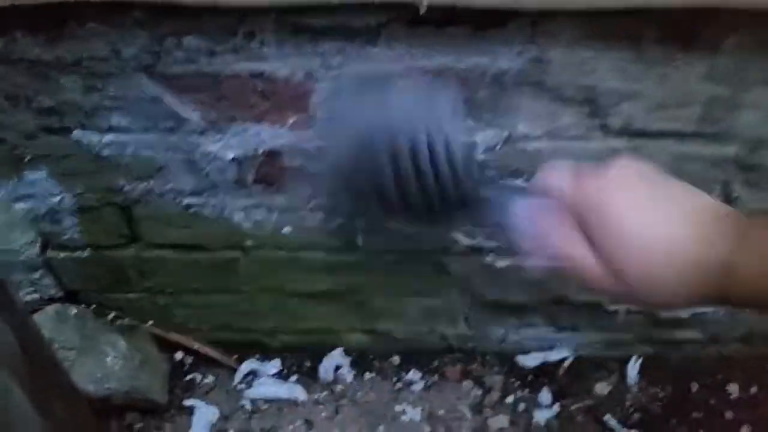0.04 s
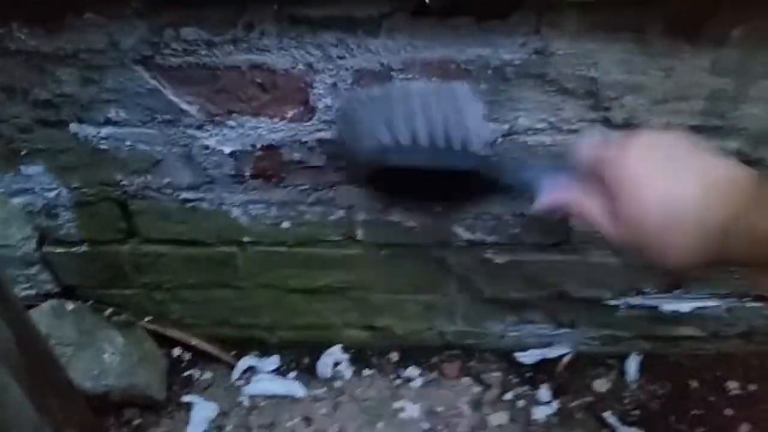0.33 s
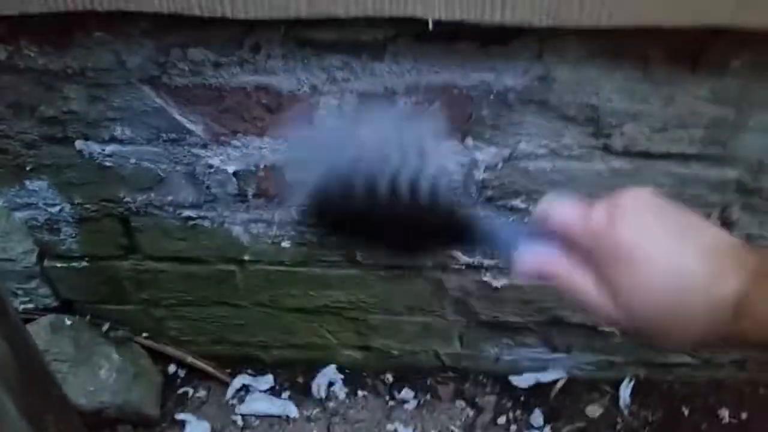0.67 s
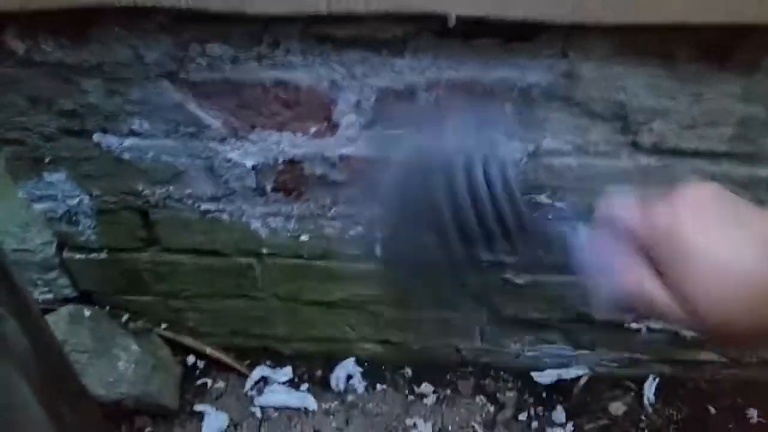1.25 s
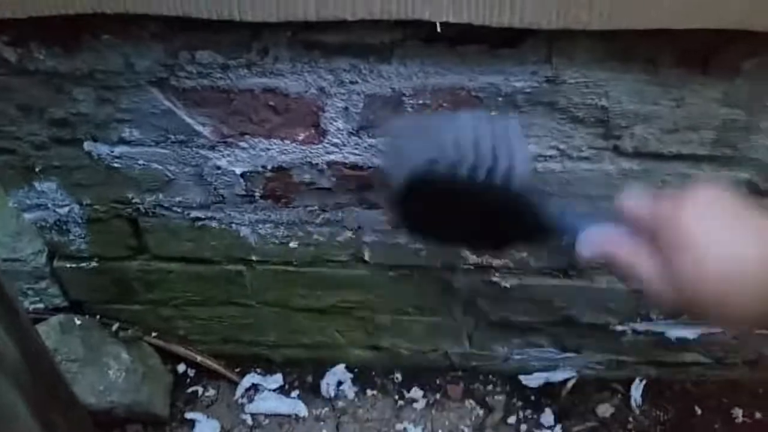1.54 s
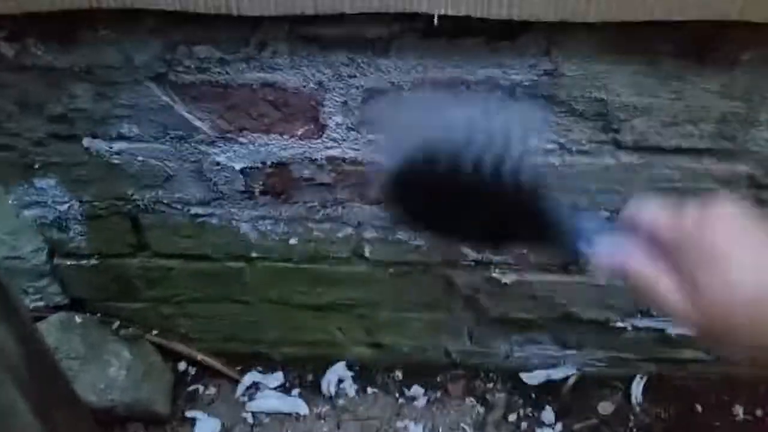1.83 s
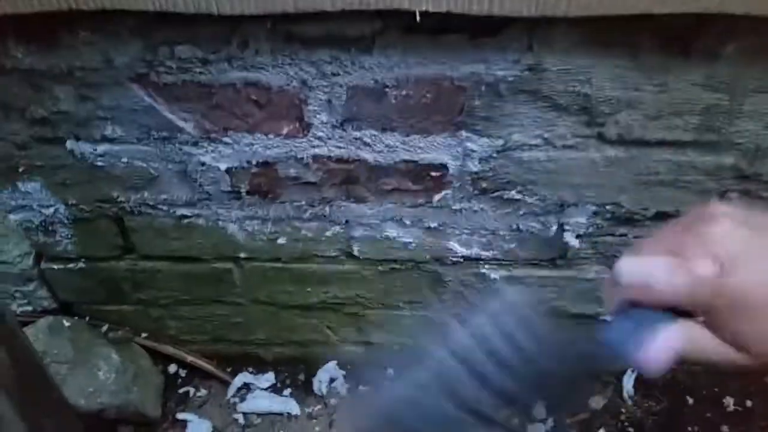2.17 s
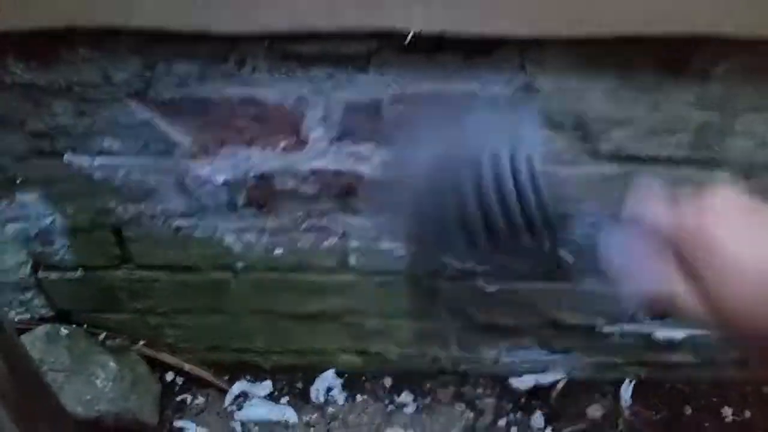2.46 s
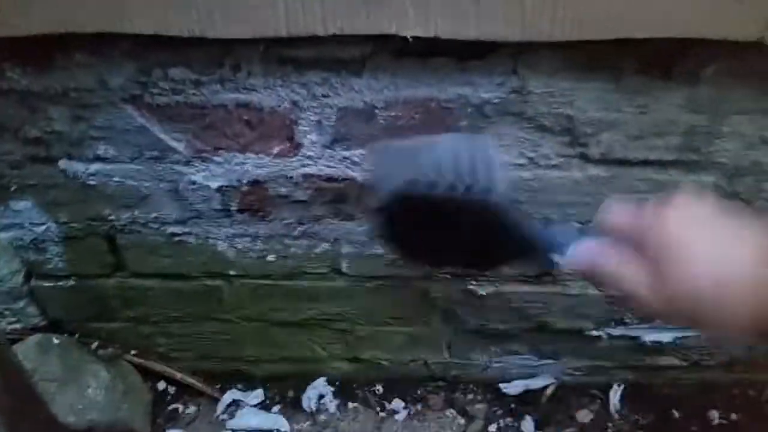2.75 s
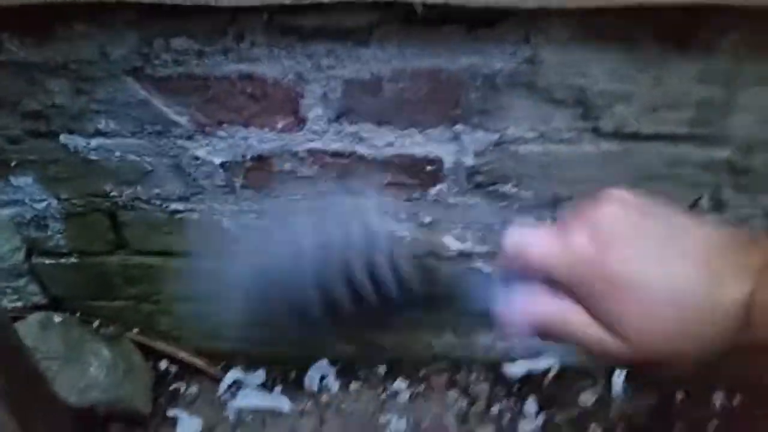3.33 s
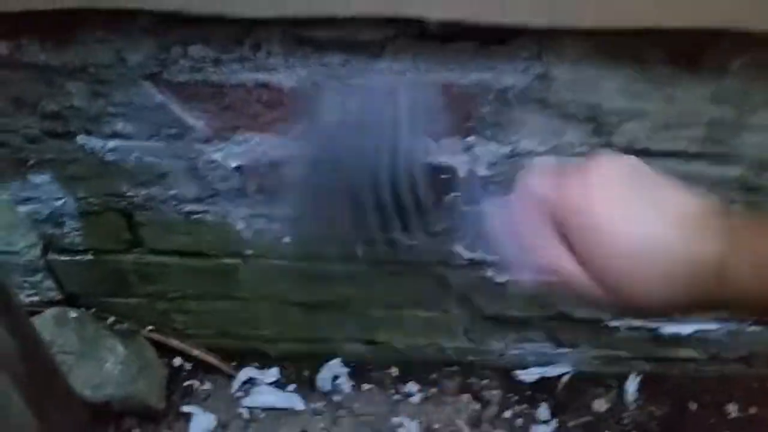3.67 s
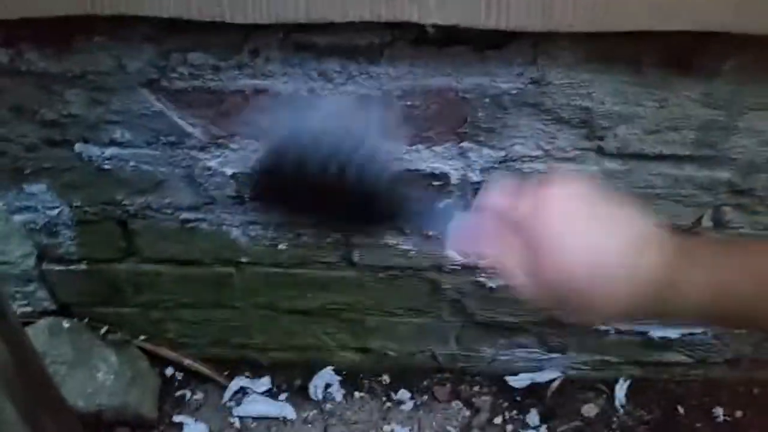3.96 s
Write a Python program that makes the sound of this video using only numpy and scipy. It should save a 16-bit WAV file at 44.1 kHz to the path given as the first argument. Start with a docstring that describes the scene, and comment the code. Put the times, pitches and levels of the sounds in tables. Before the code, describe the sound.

Close up in a yard, a stiff brush beats steadily on brick, every quick blow thumping and crunching with a short hiss of bristles. A few tiny grit ticks and a soft final scuff sound over low background hum.

```python
"""A yard outdoors, a stereo microphone close to a brick wall. A stiff plastic brush is knocked against
the wall about four times a second. Each blow is a low thump of brush and wall, a clack of the head and
a crunch of bristle tips, with a short hiss as the bristles spring back. The yard adds short reflections.
A low hum and rumble lie behind; there are small ticks of grit, thin swishes and a soft scuff near the end."""
import sys
import numpy as np
from scipy import signal
from scipy.fft import rfft, irfft
from scipy.io import wavfile
from scipy.ndimage import uniform_filter1d

SR = 44100
rng = np.random.default_rng(int(sys.argv[2]) if len(sys.argv) > 2 else 0)


def to_wav(sig):
    """Store sig (one row per channel, or 1-D mono) as 16-bit WAV at the path in sys.argv[1].

    Samples outside -1..1 are clipped; the rate is SR.
    """
    pcm = np.clip(np.atleast_2d(sig), -1, 1) * 32767
    pcm = np.round(pcm).astype(np.int16)
    wavfile.write(sys.argv[1], SR, pcm.T)  # frames by channels


N = 176400

# The open air. Each row: frequency in Hz, relative level in dB.
AIR_SPECTRUM = [(12, -42), (20, -30), (60, -1.5), (96, -0.5), (130, 0.5), (150, -21.5), (172, -16.5),
                (319, -10), (459, -26), (527, -25.5), (698, -32.5), (1060, -36), (1760, -43.5), (2750, -44),
                (3340, -52.5), (5230, -52.5), (6910, -61), (10500, -58), (12400, -52.5), (16000, -56)]
# The air across the microphone. Each row: frequency in Hz, left-right likeness from 0 to 1.
AIR_COHERENCE = [(25, .3), (60, 0.73), (130, .97), (300, 0.99), (550, 0.59), (1650, .05), (15000, .05)]
# Where the air leans. Each row: frequency in Hz, left over right in dB.
AIR_LEAN = [(60, -3), (150, 3), (380, -4), (950, -3), (2380, -2), (5980, -14), (15000, 3)]
# Drift of the air's middle range. Each row: time in seconds, boost in dB.
AIR_MID_DRIFT = [(0, 6), (.45, 4), (.9, 2), (1.5, 2.5), (2.2, -0.5), (3, -2.5), (4, 5)]
# Colour of the yard's reflections. Each row: frequency in Hz, gain in dB.
YARD_COLOUR = [(60, -40.5), (120, -1), (300, -7.5), (600, -10), (1200, -15), (3000, -24), (8000, -24.5),
               (16000, -21)]
# Their decay. Each row: frequency in Hz, seconds to fall 60 dB.
YARD_DECAY = [(100, 0.47), (400, 0.22), (1500, 0.1), (5000, 0.57), (16000, .16)]
# Colour of the two microphone ports. Each row: frequency in Hz, gain in dB.
LEFT_PORT = [(100, -0.5), (450, 5.5), (800, 5), (1200, 0.5), (2000, 12), (2800, 5.5), (4200, -12.5),
             (6400, -16.5), (9000, -12.5), (11500, 10), (16000, -15)]
RIGHT_PORT = [(100, -1), (450, 7.5), (800, 2), (1200, 3.5), (2000, -1.5), (2800, 4), (4200, 2.5),
              (6400, -0.5), (9000, 8), (11500, 7.5), (16000, -3)]
# Ticks of grit. Each row: start in seconds, level in dB, centre in Hz.
GRIT_TICKS = [(.5355, -36.5, 6500), (2.129, -44.5, 9500), (2.152, -51, 11100), (3.916, -29, 1580)]
# Scuffs and swishes. Each row: start and length in seconds, level in dB, centre in Hz, width in octaves.
RUBS = [(0.417, 0.2, -60.5, 1900, 1), (2.427, 0.15, -69.5, 13000, 0.13), (2.952, 0.34, -74, 12600, .18),
        (3.02, 0.23, -63, 14800, 0.071), (3.885, 0.026, -58, 1670, 0.26), (3.887, 0.017, -42.5, 450, 0.18),
        (3.905, 0.042, -56.5, 1590, 0.34), (3.911, 0.073, -58.5, 3640, .15), (3.929, 0.068, -46, 847, 0.57),
        (3.91, 0.1, -62.5, 7000, 0.2)]
# Colours of the bristles' hiss and of the tips' crunch. Each row: frequency in Hz, gain in dB.
HISS_COLOUR = [(300, -38), (1500, 0.5), (3500, 1.5), (7000, 7.5), (10000, -7), (12500, -2), (16000, 8)]
CRUNCH_COLOUR = [(100, -19.5), (400, 2), (600, 9.5), (1000, 9.5), (2000, 4.5), (3000, -1), (3800, -4.5),
                 (5200, 8), (8000, -0.5), (10000, -11.5), (12000, -5), (16000, 5)]
# The five frequencies in Hz at which each blow sets the level of its crunch.
CRUNCH_BANDS = [400, 750, 1150, 2000, 4200]
# Low modes of brush and wall. Each row: frequency in Hz, relative level in dB, seconds to fall 60 dB.
THUMP_MODES = [(47.4, -34, 0.016), (100.6, -9, 0.086), (126.6, -3.5, 0.043), (163, -2.5, 0.027),
               (191, -27.5, 0.15), (280.3, -17.5, 0.053), (372.7, -12, 0.031)]
# The blows. Each row: start in seconds; relative levels in dB of thump, crunch bass and low, middle and
# high clack; the three clack pitches in Hz; relative levels in dB of crunch treble and hiss; seconds to
# the hiss peak.
BRUSH_BLOWS = [(0.1767, -19.5, -37, -37.3, -26.5, -33, 920, 1100, 1760, -31.5, -54, 0.024),
               (0.4103, -19.5, -36.5, -39.5, -34.5, -31, 694, 1230, 1750, -31.0, -52, 0.025),
               (0.6586, -20, -35.5, -28, -38, -30.0, 710, 1210, 1780, -30.5, -51, 0.023),
               (0.9104, -20.0, -48, -33, -33.5, -34, 630, 1220, 1900, -33, -54, 0.028),
               (1.1479, -18, -30.5, -31, -31.5, -31.5, 796, 1050, 1950, -32, -53.5, 0.021),
               (1.3797, -19.5, -56, -54, -34, -35.5, 602, 1115, 2530, -33.5, -50.5, 0.017),
               (1.6117, -19.5, -34, -28, -33.5, -33.5, 870, 1130, 1784, -31.5, -52.5, 0.025),
               (1.8545, -18, -25, -34, -28, -30.5, 756, 1030, 2347, -33, -52.5, 0.022),
               (2.0958, -26, -27.5, -41.5, -36.5, -40.5, 580, 1146, 1970, -31, -52.5, 0.022),
               (2.3463, -21, -24.5, -32, -42.5, -35, 780, 1340, 2606, -34, -51, 0.018),
               (2.582, -22, -32.5, -32, -35, -34, 722, 1332, 1420, -34.5, -52, 0.014),
               (2.816, -23.5, -17.5, -47.5, -37.5, -40, 586, 1355, 2530, -33.5, -53, 0.018),
               (3.0597, -24.2, -23.5, -33.5, -27.5, -34.5, 753, 1070, 1440, -34.5, -53.5, 0.03),
               (3.3082, -20.5, -37.5, -33.5, -32.5, -33.5, 683, 1360, 1930, -30.5, -50, 0.021),
               (3.5553, -19, -36, -32, -29, -33.5, 744, 1283, 1640, -33.5, -54, 0.02),
               (3.7818, -19, -34.5, -30.5, -33.5, -33, 796, 1260, 1636, -32, -56, 0.02)]


def amp(db):
    """Decibels to gain."""
    return 10 ** (np.asarray(db) / 20)


def unit_rms(x):
    """Scales to rms 1."""
    return x / np.sqrt(np.mean(x ** 2) + 1e-20)


def curve_at(points, hz):
    """Reads a table on a log-frequency axis."""
    f, value = np.transpose(points)
    return np.interp(np.log(hz + 1), np.log(f + 1), value)


def add(mix, start, sound):
    """Mixes a sound in at a start time in seconds."""
    part = mix[..., max(round(start * SR), 0):][..., :sound.shape[-1]]
    part += sound[..., :part.shape[-1]]


def colour(x, points, size=4096):
    """Minimum-phase filter with the given (Hz, dB) curve."""
    log_gain = np.log(amp(curve_at(points, abs(np.fft.fftfreq(size, 1 / SR)))))
    taps = np.fft.ifft(np.exp(np.conj(signal.hilbert(log_gain)))).real[:size // 2]
    return signal.fftconvolve(x, taps[None], axes=1)[:, :x.shape[1]]


def band_noise(count, hz, octaves):
    """Stereo noise in a bell around hz."""
    f = np.fft.rfftfreq(count, 1 / SR) + 1
    bell = np.exp(-.5 * (np.log2(f / hz) / octaves) ** 2)
    return unit_rms(irfft(rfft(rng.standard_normal((2, count))) * bell, count))


def wander(points, count):
    """A smooth random curve of rms 1."""
    return unit_rms(signal.resample(rng.standard_normal(points), count))


def blend(shared, own, likeness):
    """Noise at one port that partly follows the other port's noise."""
    return likeness * shared + np.sqrt(1 - likeness ** 2) * own


def open_air(level_db=-35.5, patch_db=1.5):
    """Outdoor rumble and faint hiss, all around the microphone."""
    frames, hz = N // 512 + 5, np.fft.rfftfreq(2048, 1 / SR)
    a, b, c, d, patches = rng.standard_normal((frames, len(hz), 5)).T
    left = a + 1j * b
    right = blend(left, c + 1j * d, curve_at(AIR_COHERENCE, hz)[:, None])
    lean = amp(curve_at(AIR_LEAN, hz) / 2)[:, None]
    spectra = np.array([left * lean, right / lean])
    mid_band = np.exp(-.5 * (np.log2((hz + 1) / 2200) / 2.08) ** 2)[:, None]
    drift_db = np.interp(np.linspace(0, N / SR, frames), *np.transpose(AIR_MID_DRIFT))
    patches = unit_rms(uniform_filter1d(uniform_filter1d(patches, 10, 0), 10, 1))
    spectra *= amp(curve_at(AIR_SPECTRUM, hz)[:, None] + mid_band * drift_db + patch_db * patches)
    return amp(level_db) * unit_rms(signal.istft(spectra, nperseg=2048, noverlap=1536)[1][:, :N])


def hum(hz=119.6, waver_hz=1.0, level_db=-38.5):
    """A low hum in the background, its pitch wavering slightly."""
    pitch = hz + waver_hz * wander(40, N)
    return amp(level_db) * np.sqrt(2) * np.sin(2 * np.pi * np.cumsum(pitch) / SR)


def yard(x, rise_s=0.0064):
    """Short diffuse reflections, alike at both ports in the bass."""
    hz, t, tail = signal.stft(rng.standard_normal((2, SR // 2)), SR, nperseg=256)
    hz = hz[:, None]
    tail[0] = blend(tail[1], tail[0], 1 / (1 + (hz / 1500) ** 2))
    t60 = curve_at(YARD_DECAY, hz)
    equal_energy = np.sqrt(2 * np.log(1000) / (t60 * SR))
    tail *= amp(curve_at(YARD_COLOUR, hz) - 60 * t / t60) * equal_energy * np.minimum(t / rise_s, 1)
    return signal.fftconvolve(x, signal.istft(tail, SR, nperseg=256)[1], axes=1)[:, :N]


def microphone(x, left_lag_s=0.00017):
    """Each port colours the sound; coming from slightly to the right, it reaches the left one later."""
    samples = np.arange(N)
    left = np.interp(samples - round(left_lag_s * SR), samples, colour(x[:1], LEFT_PORT)[0])
    return np.array([left, colour(x[1:], RIGHT_PORT)[0]])


def grit(count=1024, t60=0.0073):
    """Grit ticks in tiny bursts of narrow noise."""
    out, t = np.zeros((2, N)), np.arange(count) / SR
    for start, db, hz in GRIT_TICKS:
        add(out, start, amp(db - 60 * t / t60) * np.minimum(t * hz / 2, 1) * band_noise(count, hz, 0.3))
    return out


def scuffs():
    """Soft scuffs and thin swishes: bands of noise that swell quickly and fade."""
    out = np.zeros((2, N))
    for start, length, db, hz, octaves in RUBS:
        swell = np.sin(np.pi * np.sqrt(np.linspace(0, 1, int(length * SR))))
        rub = band_noise(SR // 2, hz, octaves)[:, :len(swell)]
        add(out, start, amp(db) * swell * unit_rms(rub + .5 * rub[::-1]))  # each side spills across
    return out


def bristle_hiss(t, db, peak_s, grain_db=1, flutter_db=1.5):
    """A grainy hiss swells and fades as the bristles spring back and slide off the brick."""
    u = t / peak_s
    swell = u * np.exp((1 - u ** 1.25) / 1.24)
    grains = unit_rms(rng.standard_normal((2, len(t))) * amp(grain_db * rng.standard_normal(len(t))))
    return amp(db + 1) * swell * grains * amp(flutter_db * wander(120, len(t)))


def tip_crunch(t, band_db, tips_per_s=12000, rise_s=0.00029, hold_s=0.0021, t60=0.022, rattle_t60=0.047):
    """Dozens of tips land within a few milliseconds; the two ports hear their treble differently."""
    late = np.maximum(t - hold_s, 0)
    shape = np.minimum(t / rise_s, 1) * np.hypot(amp(-60 * late / t60), amp(-10 - 60 * late / rattle_t60))
    tips = rng.standard_normal((2, len(t))) * (rng.random((2, len(t))) < tips_per_s / SR) * shape
    spectrum, hz = rfft(tips), np.fft.rfftfreq(len(t), 1 / SR)
    spectrum[0] = blend(spectrum[1], spectrum[0], 1 / (1 + (hz / 4600) ** 2))
    spectrum /= np.sqrt(uniform_filter1d(abs(spectrum) ** 2, 512, axis=1) + 1e-12)  # flatten
    burst = irfft(spectrum) * (t < t[-1] / 2)
    return amp(30) * colour(burst, list(zip(CRUNCH_BANDS, band_db)))


def head_clack(t, db, hz, delay_s=0.00029, rise_s=0.0012, t60=0.014):
    """One heavily damped mode of the plastic head."""
    u = np.maximum(t - delay_s, 0)
    return -amp(db + 15 - 60 * u / t60) * (1 - np.exp(-u / rise_s)) * np.sin(2 * np.pi * hz * u)


def thump(t, db, delay_s=0.00042, rise_s=0.0072, detune=0.018, rebound_s=0.01487, push_s=0.0032):
    """Low modes of brush and wall swell as the bristles compress; the head rebounds with a soft push."""
    u = np.maximum(t - delay_s, 0)
    ring = 0
    for hz, mode_db, t60 in THUMP_MODES:
        pitch = hz * (1 + detune * rng.uniform(-1.23, 1))
        ring += amp(mode_db - 60 * u / t60) * np.cos(2 * np.pi * pitch * u)
    swell = 1 - np.exp(-u / rise_s)
    push = (t - rebound_s) / push_s
    rebound = (1 - 2 * push ** 2) * np.exp(-push ** 2)
    return amp(db - 1.5) * rebound - amp(db + 17.5) * swell * ring


def brush(count=16384):
    """The brush strikes the brick close to the microphone: thump, clack, crunch and hiss at each blow."""
    t = np.arange(count) / SR
    body, tips, hiss = np.zeros((3, 2, N))
    for (start, thump_db, bass_db, low_db, mid_db, high_db,
         low_hz, mid_hz, high_hz, treble_db, hiss_db, hiss_s) in BRUSH_BLOWS:
        clack = head_clack(t, low_db, low_hz) - head_clack(t, mid_db, mid_hz)
        clack += head_clack(t, high_db, high_hz)
        add(body, start, thump(t, thump_db) + clack)
        add(tips, start, tip_crunch(t, [bass_db, low_db, mid_db, high_db, treble_db]))
        add(hiss, start, bristle_hiss(t, hiss_db, hiss_s))
    return body + colour(tips, CRUNCH_COLOUR) + colour(hiss, HISS_COLOUR)


def scene():
    """The brush up close, with reflections that change as it moves, over the air and the hum."""
    near = brush() + grit() + scuffs()
    turn = np.pi * np.arange(N) / SR  # crossfades two sets of reflections
    reflections = yard(near * np.cos(turn)) + yard(near * np.sin(turn))
    return microphone(near + reflections) + open_air() + hum()


def record(dry):
    """The recorder cuts the treble above 16 kHz."""
    lowpass = signal.firwin(255, 16000, window=("kaiser", 9), fs=SR)
    return signal.oaconvolve(dry, lowpass[None], "same")


dry = scene()
out = record(dry)
to_wav(out)
```